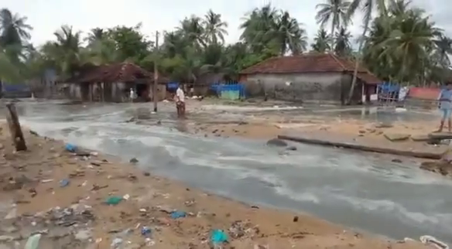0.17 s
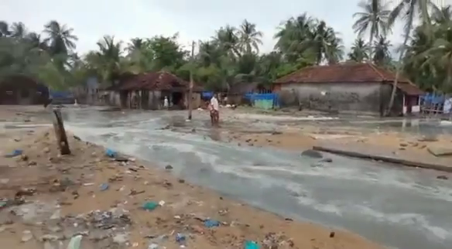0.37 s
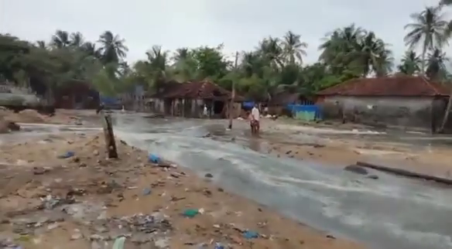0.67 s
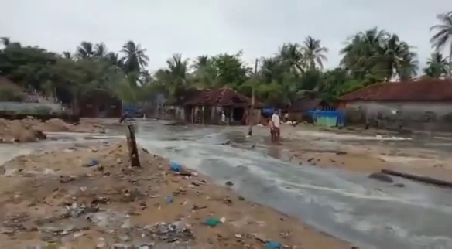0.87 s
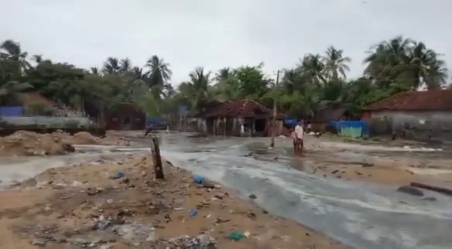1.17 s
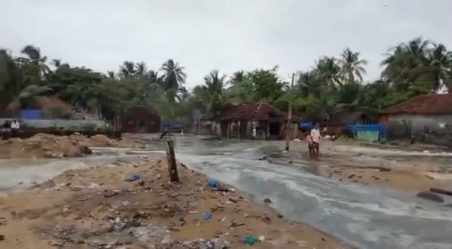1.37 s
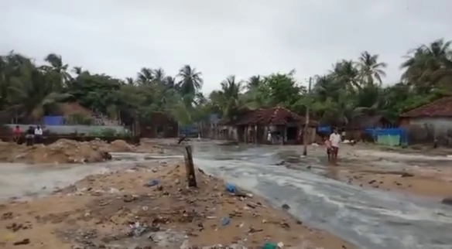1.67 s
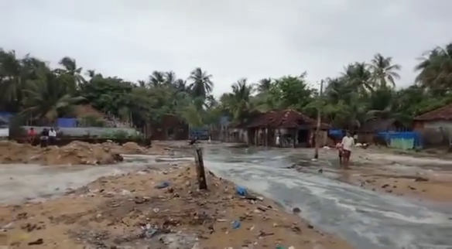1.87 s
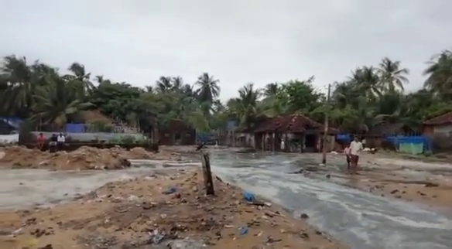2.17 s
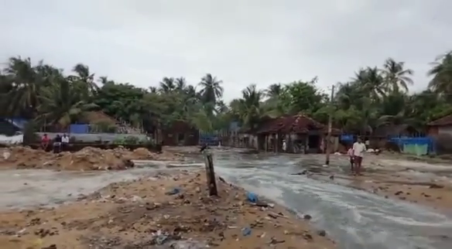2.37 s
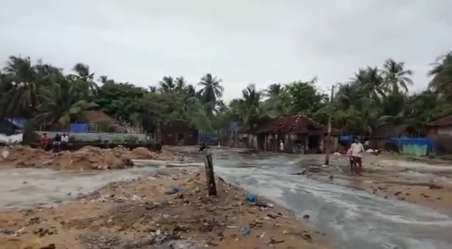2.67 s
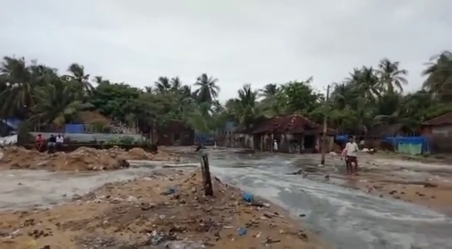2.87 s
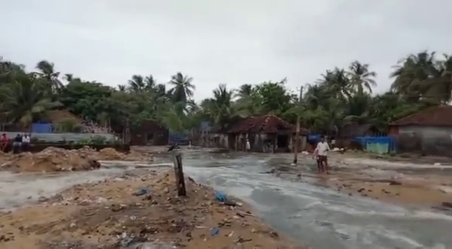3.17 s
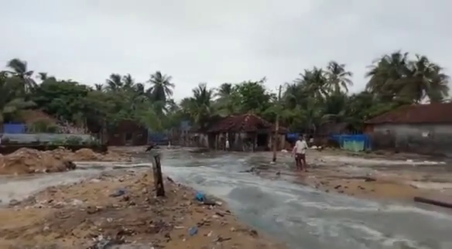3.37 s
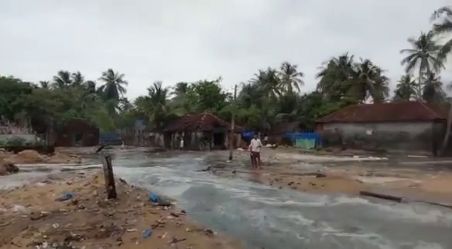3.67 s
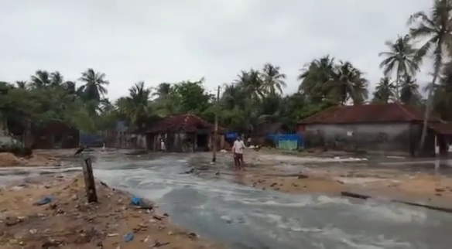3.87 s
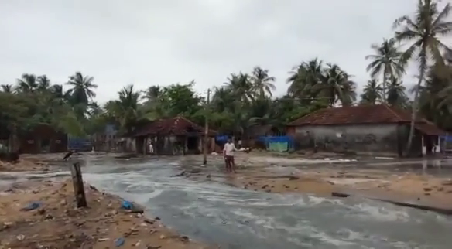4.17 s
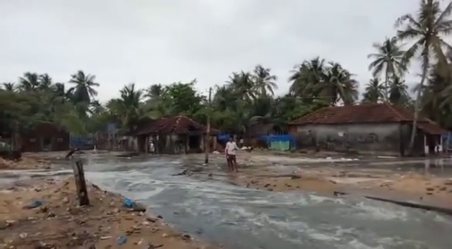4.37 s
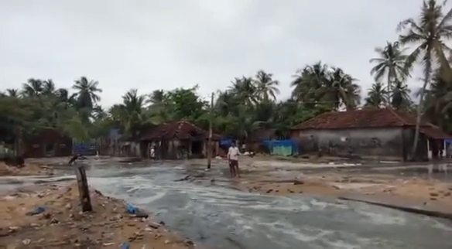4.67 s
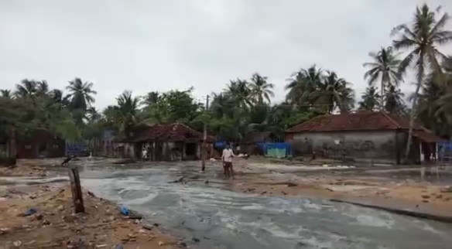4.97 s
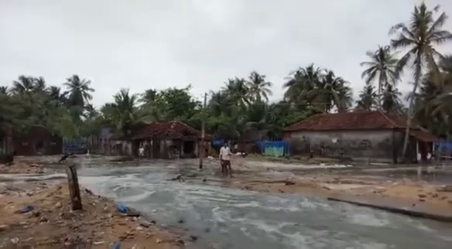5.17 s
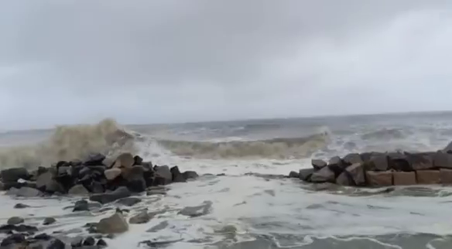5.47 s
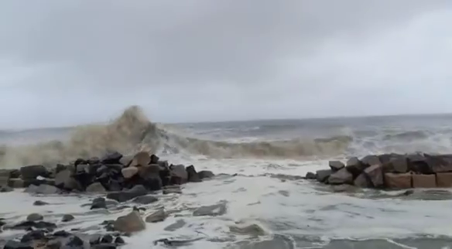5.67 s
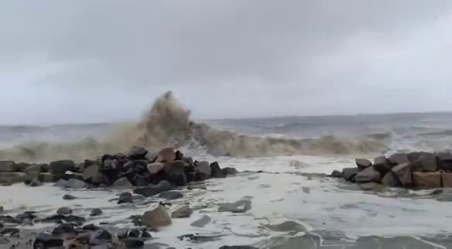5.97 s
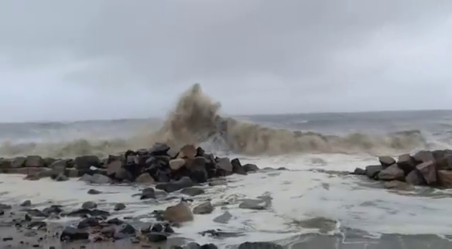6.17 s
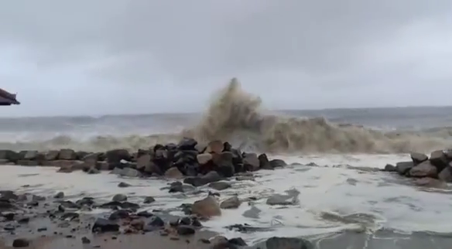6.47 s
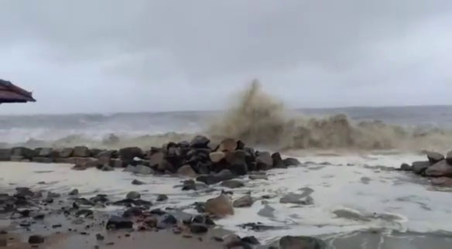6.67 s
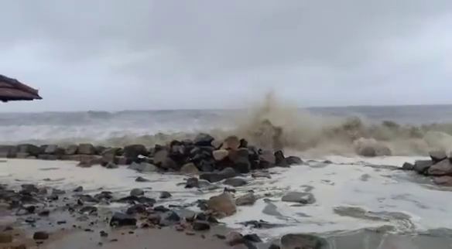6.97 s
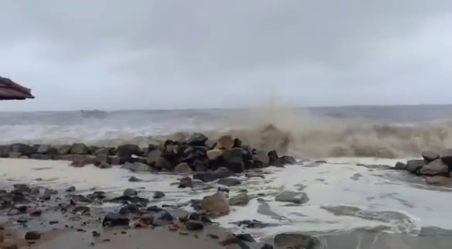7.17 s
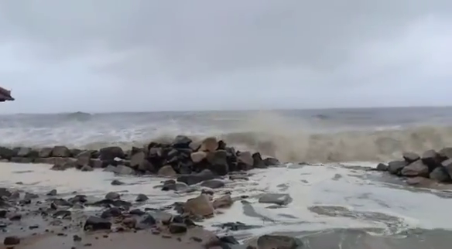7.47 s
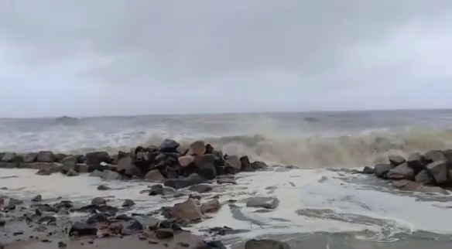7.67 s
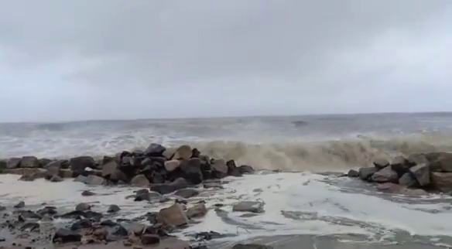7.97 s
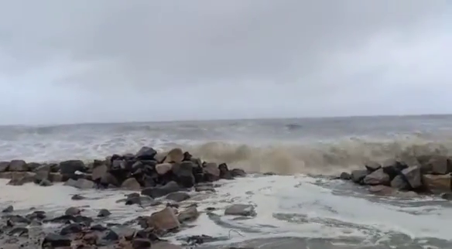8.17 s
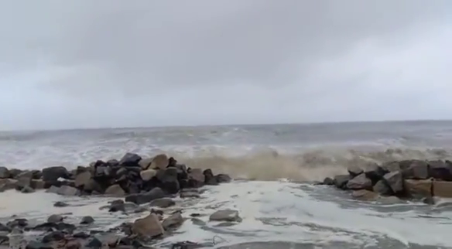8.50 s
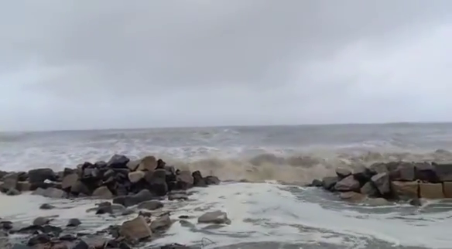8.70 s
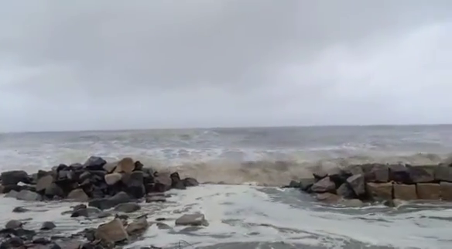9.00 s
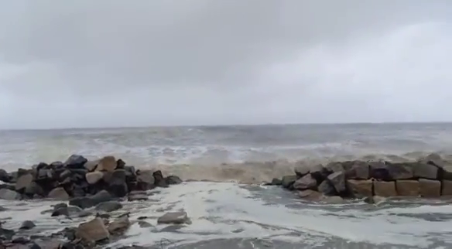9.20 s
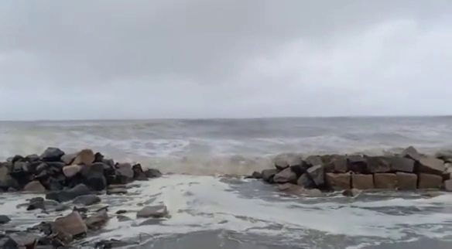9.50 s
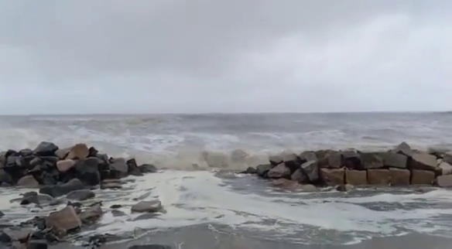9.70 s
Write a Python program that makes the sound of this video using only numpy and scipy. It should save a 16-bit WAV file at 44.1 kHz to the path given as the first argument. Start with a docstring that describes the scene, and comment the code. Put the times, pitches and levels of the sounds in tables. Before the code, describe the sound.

On an overcast windy shore, a close mono phone microphone hears water running over flooded sand. A low boom builds, then bright wash and spray swell and recede, with plops and a small splash. A crow caws hoarsely four times, echoing off houses, and a small bird whistles faintly. After a cut and brief silence, more distant breakers fade in on stereo, roaring against a rock wall.

```python
"""Heavy surf on a windy coast, in two stretches with a short silence between them.
First, on one microphone, a wave runs up over flooded sand, booming, then hissing, while a crow caws.
Then, faded in on two microphone ports, breakers roar on a rock wall further off.
Surf and wind are noise shaped over time and pitch; plops, splash and gurgles are ringing bubbles;
the crow is a set of rattling harmonics with breath, and a small far bird whistles in gliding sines."""
import sys
import numpy as np
from scipy import signal
from scipy.io import wavfile
from scipy.ndimage import uniform_filter1d, map_coordinates

SR = 44100
rng = np.random.default_rng(int(sys.argv[2]) if len(sys.argv) > 2 else 0)


def transcribe(signal):
    """Save signal, clipped to [-1, 1], as a 16-bit WAV file at the path in sys.argv[1]."""
    frames = np.atleast_2d(signal).T
    limited = np.clip(frames, -1, 1)
    pcm = np.round(limited * 32767).astype(np.int16)
    wavfile.write(sys.argv[1], SR, pcm)


N = 433944
CUT_S, BACK_S, FADE_S = 5.219, 5.346, .27  # near stretch ends, far one begins, its fade-in length
WINDOW, HOP = 2048, 256  # samples


def wave():
    """The wave on the sand: countless bubbles heard close by on one microphone."""
    # colours of roar, wash, spray and mist, one list each: f/Hz, density/dB per Hz
    layer_colours = [
        [(210, -31), (350, -4), (482, -1), (684, -3.5), (956, -1.5), (1200, -6.5), (1560, -7), (2640, -120)],
        [(710, -36), (1200, -5), (2290, -1), (2640, -4), (3720, -6), (4700, -13), (6110, -47.5), (10300, -120)],
        [(3000, -62), (5100, 1), (6760, -5.5), (8250, 0), (10700, -9.5), (13900, -42), (22000, -120)],
        [(6530, -19), (11100, 1), (12900, -5.5), (15100, -3.5), (16000, -5.5)],
    ]
    hz, gain = water(near_levels, layer_colours, swell_db=1.0, flicker_db=0.83)
    return sound(gain * noise())


def near_levels(t):
    """Boom centre in Hz, then dB of boom, wind, roar, wash, spray and mist as the wave runs up."""
    # the run-up: t/s, boom centre f/Hz, then boom, roar, wash and spray level/dB
    run_up = [(0.0, 171, -37, -37, -42, -51), (.65, 175, -34.5, -40, -40.5, -50),
              (.82, 145, -33, -39, -41.5, -50), (1.15, 143, -30.5, -38.5, -41, -50.5),
              (1.56, 140, -27.5, -38.5, -42.5, -51), (1.85, 171, -26.5, -37, -35.5, -38.5),
              (2.02, 179, -25.5, -33, -36.5, -39.5), (2.14, 202, -27.5, -38.5, -35.5, -38),
              (2.19, 214, -25, -33, -30.5, -36), (2.36, 224, -24.5, -33, -30, -36.5),
              (2.5, 217, -26, -33, -28.5, -34.5), (2.66, 227, -26, -29.5, -27, -32),
              (2.72, 236, -26, -26, -25, -33), (2.95, 244, -22.5, -29.5, -25, -31.5),
              (3.12, 248, -24, -23.5, -25, -31.5), (3.32, 250, -24.5, -27, -27.5, -34),
              (3.55, 256, -27, -28, -28, -35.5), (4.0, 253, -30, -29.5, -30, -38),
              (4.2, 250, -32.5, -33.5, -32.5, -40), (4.55, 264, -34.5, -38, -36, -47),
              (5.0, 177, -35.5, -38.5, -34, -47.5), (5.2, 174, -37, -39, -34.5, -47.5)]
    # surges and lulls of the boom: peak t/s, level above or below the swell/dB
    surges = [(.76, -0.5), (.87, 1.5), (1.09, 4), (1.29, 2.5), (1.68, 1), (1.76, 0.5), (1.82, -4.5),
              (2.83, 3.5), (3.09, 1.5), (3.24, 4), (3.5, -1.5), (3.58, -5.5)]
    # wind on the microphone: t/s, level/dB
    gusts = [(0., -52), (.65, -65), (1.1, -58), (1.7, -64), (2., -62), (2.6, -50.5), (3.1, -66),
             (3.45, -72), (4.1, -52), (5.2, -62.5)]
    mist_calm_db, spray_calm_db = -61, -47.5
    mist_per_spray = 1.26  # dB of mist per dB of spray above its calm level
    mist_peak_s, mist_settles_db_s = 3.2, 4  # mist thins sooner than the spray after its peak

    s, *columns = np.transpose(run_up)
    boom_hz, boom, roar, wash, spray = (np.interp(t, s, c) for c in columns)
    boom = boom + bumps(t, surges, rise_s=.02, fall_s=.05)
    wind = np.interp(t, *np.transpose(gusts))
    settling = mist_settles_db_s * np.maximum(t - mist_peak_s, 0)
    mist = mist_calm_db + np.maximum(mist_per_spray * (spray - spray_calm_db) - settling, 0)
    return boom_hz, boom, wind, roar, wash, spray, mist


def breakers():
    """Breakers on the wall: the ports share the bass; the treble reaches each by its own paths."""
    # colours of roar, wash, spray and mist, one list each: f/Hz, density/dB per Hz
    layer_colours = [
        [(130, -120), (260, 0), (360, -6), (450, 0), (640, 1), (850, -2.5), (1100, -5.5), (1500, -32),
         (3000, -120)],
        [(475, -120), (950, -22), (1300, -0.5), (1620, -2.5), (1920, 1), (2150, -1), (2450, 2), (2800, -1),
         (3300, -8.5), (4000, -8.5), (4600, -13), (5800, -24), (11600, -120)],
        [(2100, -120), (4200, -8), (5100, -0.5), (5600, -1), (6300, -7), (7200, -12.5), (8500, -16),
         (9600, -21.5), (10500, -21), (12500, -46), (25000, -120)],
        [(4750, -120), (9500, -27), (11200, -1), (12200, -5), (13600, 0), (15000, -4), (16000, -12)],
    ]
    # likeness of the two ports: f/Hz, shared part of the power/0-1
    likeness = [(80, .98), (240, .95), (330, .86), (450, .76), (750, .72), (950, .48), (1250, .22),
                (1400, .3), (1750, .17), (2400, .42), (3500, .25), (7000, .15), (15000, .08)]
    # balance: f/Hz, left minus right level/dB
    balance = [(60, .6), (1000, .5), (1500, 1.6), (2100, 2.8), (3400, 2.3), (4300, .8), (5500, -6.5),
               (6500, -5), (7800, 0), (15000, 0)]
    # left port late, as rumble comes from ahead and hiss from the right: f/Hz, lag/s
    lag = [(50, .0001), (700, .00004), (1400, .00012), (1800, .00047), (16000, .00048)]

    hz, gain = water(far_levels, layer_colours, swell_db=.5, flicker_db=1.3)
    like = np.clip(colour(likeness, hz), 0, 1)[:, None]
    half = undb(colour(balance, hz) / 2)[:, None]
    late = np.exp(-2j * np.pi * hz * colour(lag, hz))[:, None]
    shared = np.sqrt(like) * noise()
    left = (shared * late + np.sqrt(1 - like) * noise()) * half
    right = (shared + np.sqrt(1 - like) * noise()) / half
    return sound(gain * np.array([left, right]))


def far_levels(t):
    """The same controls for the breakers: all hissing layers swell together when one crashes."""
    # breakers on the wall: t/s, boom level/dB, hiss level above or below calm/dB
    crashes = [(5.7, -35.5, -3), (6.1, -33.5, -0.5), (6.7, -33.5, 6), (7.2, -32, 2.5), (7.7, -31.5, -1),
               (8.7, -32, -4), (9.1, -31.5, -4), (9.6, -31, -2.5)]
    # short swells and dips of the hiss: peak t/s, level above or below the slower hiss/dB
    hiss_bumps = [(5.46, 2.5), (6.37, -1), (6.7, 3), (6.83, 3), (7.13, 0), (7.75, 1.5), (7.86, 3),
                  (8.42, 1.5), (8.59, 2.5), (9.03, 0.5), (9.2, 1)]
    # calm level/dB of roar, wash, spray, mist
    calm_db = [-41, -47, -51, -62]
    # how far each of these follows the hiss: dB per dB
    follow = [0.51, 0.45, 0.55, 0.39]
    boom_hz, wind_db = 124, -26  # wind level is against the boom

    s, boom, hiss = np.transpose(crashes)
    boom = np.interp(t, s, boom)
    hiss = np.interp(t, s, hiss) + bumps(t, hiss_bumps, rise_s=.03, fall_s=.07)
    layers = [db + k * hiss for db, k in zip(calm_db, follow)]
    return boom_hz + 0 * t, boom, boom + wind_db, *layers


def bumps(t, rows, rise_s, fall_s):
    """Short swells or dips in dB, quicker to come than to go."""
    return sum(db * np.exp(-((t - s) / np.where(t < s, rise_s, fall_s)) ** 2) for s, db in rows)


def water(controls, colours, swell_db, flicker_db):
    """Gain over pitch and time of countless bursting bubbles: big ones boom, small ones hiss."""
    # boom colour: f as a multiple of the centre, density/dB
    boom_colour = [(.2, -54), (.4, -12.5), (.6, -3.5), (.9, -0.5), (1.5, -5.5), (2.3, -12.5), (3.5, -21.5),
                   (8, -120)]
    # wind buffeting the microphone: f/Hz, density/dB per Hz
    wind_colour = [(15, -23.5), (30, -16.5), (50, -9.5), (65, 4), (85, 0.5), (200, -120)]
    # band in which each level is meant, for boom, wind, roar, wash, spray, mist: low f/Hz, high f/Hz
    level_bands = [(75, 380), (25, 80), (400, 1150), (2700, 4500), (5000, 10500), (11000, 15800)]

    hz = np.arange(WINDOW // 2 + 1) * SR / WINDOW
    t = np.arange(N // HOP + 2) * HOP / SR
    boom_hz, *levels = controls(t)
    # the cloud of big bubbles rings broadly around its centre, which may move with the wave
    boom = undb(2 * colour(boom_colour, hz[:, None] / boom_hz))
    shapes = [boom] + [undb(2 * colour(c, hz))[:, None] for c in [wind_colour] + colours]
    power = 0
    for shape, (lo, hi), db in zip(shapes, level_bands, levels):
        in_band = shape[(hz >= lo) & (hz <= hi)].sum(axis=0)
        power = power + len(hz) * shape / in_band * undb(2 * db)
    swell = swell_db * patches(hz, len(t), per_s=2.86, per_octave=1.564)
    flicker = flicker_db * patches(hz, len(t), per_s=14., per_octave=2.995)
    return hz, np.sqrt(power) * undb(swell + flicker)


def patches(hz, frames, per_s, per_octave):
    """Smooth chance over time and pitch, spread about 1."""
    grid = rng.standard_normal((64, 512))
    row = np.log2(np.maximum(hz, 20) / 20) * per_octave
    col = np.arange(frames) * HOP / SR * per_s
    where = np.meshgrid(row, col, indexing="ij")
    return 0.71 * map_coordinates(grid, where, order=3, mode="wrap")


def noise():
    """Short-time spectrum of white noise."""
    white = rng.standard_normal(N + HOP)
    return signal.stft(white, nperseg=WINDOW, noverlap=WINDOW - HOP)[2][:, :N // HOP + 2]


def sound(spectrum):
    """Turn a short-time spectrum back into a waveform."""
    return signal.istft(spectrum, nperseg=WINDOW, noverlap=WINDOW - HOP)[1][..., :N]


def plops():
    """Single drops and pockets of air close by, each a ringing bubble."""
    # t/s, f/Hz, level/dB, t60/s, upward glide (half the share by which f has risen at t60)
    drops = [(.079, 5250, -39, .025, .02), (.079, 5900, -39, .025, .02), (.435, 2250, -27, .08, .02),
             (1.418, 1550, -24, .03, .05), (1.42, 1950, -30, .02, .05), (1.978, 1750, -22, .03, .02),
             (1.834, 520, -18, .08, .03), (5.04, 3000, -26, .08, .02), (9.335, 2050, -36, .08, .06),
             (9.738, 2080, -25, .022, .02), (9.738, 3800, -27, .004, .02), (9.744, 2070, -36, .14, .2)]
    out = np.zeros(N)
    for s, hz, db, t60, glide in drops:
        add(out, s, undb(db) * bubble(hz, t60, glide))
    return out


def splash():
    """A handful of spray lands near: a quick cluster of small bubbles, tending to smaller ones last."""
    start_s, length_s, level_db = 1.835, .045, -26.5
    lowest_hz, span = 2850, 1.5  # span: ratio of highest to lowest pitch
    out = np.zeros(N)
    for when, pitch in rng.random((30, 2)):
        hz = lowest_hz * span ** (np.sqrt(when) * (.2 + .8 * pitch))
        add(out, start_s + when * length_s, undb(level_db) * bubble(hz, t60=.03, glide=.05))
    return out


def gurgle(db, cycles):
    """Scattered small bubbles in the running water, each dying by 60 dB over the same time in cycles/hz."""
    out = np.zeros(N)
    for when, pitch, size in rng.random((1500, 3)):
        hz = 700 * 2 ** (2.6 * pitch)
        add(out, when * N / SR, undb(db - 10 * size) * bubble(hz, cycles / hz, glide=0.22))
    return out


def bubble(hz, t60, glide):
    """A dying ring whose pitch climbs as the bubble nears the surface."""
    t = np.arange(int(t60 * SR)) / SR
    ring = np.sin(2 * np.pi * hz * (t + glide * t ** 2 / t60))
    attack = np.minimum(t / 0.00041, 1)
    return ring * undb(-60 * t / t60) * attack


def birds():
    """The crow with an echo off the houses, and the thin broken whistle of a small far bird."""
    # caws: t/s, length/s, f at start/Hz, f at top/Hz, f at end/Hz, top as a share of the length,
    # level/dB, swell up to the top/dB, rattle f/Hz, beak at start and at end/dB per octave,
    # unevenness/0-1, hoarseness/0-1
    caws = [(1.67, .26, 480, 498, 430, .52, -27.5, 3, 73, -18, -4, .55, .28),
            (2.35, .2, 478, 484, 470, .35, -27, 5, 73, -22, -18, .2, .4),
            (3.63, .285, 430, 478, 435, .42, -22.5, 6, 78, -12, 10, .45, .45),
            (4.705, .29, 435, 497, 400, .52, -23, 11, 77, -6, 20, .12, .18)]
    # whistled notes: t/s, length/s, start f/Hz, end f/Hz, peak level/dB
    whistles = [(.04, .075, 3790, 3800, -45), (.12, .105, 3830, 3790, -46), (.23, .06, 3660, 3620, -44),
                (4.16, .15, 3700, 3700, -36)]

    out = np.zeros(N)
    for s, *row in caws:
        call = caw(*row)
        add(out, s, call)
        add(out, s + .045, undb(-11) * call)  # echo
    for s, length, hz, end_hz, db in whistles:
        t = np.arange(int(length * SR)) / SR
        cycles = hz * t + (end_hz - hz) * t ** 2 / (2 * length)
        arch = np.sqrt(np.sin(np.pi * t / length))
        add(out, s, undb(db) * arch * np.sin(2 * np.pi * cycles))
    return out


def caw(length, start_hz, top_hz, end_hz, top, db, rise_db, rattle_hz, beak_from_db, beak_to_db,
        uneven, hoarse):
    """Harmonics through the throat, chopped by a slow rattle of the second membrane, with breath."""
    # throat resonance: f/Hz, level/dB
    throat = [(480, -24), (960, -15), (1430, -4), (1650, 0), (1950, 0), (2150, -10), (2450, -8),
              (2800, -32), (4000, -44)]
    attack_s, release_s, fall_db = .035, .025, 4.5  # fall: effort lost at the end

    t = np.arange(int(length * SR)) / SR
    # effort arches over the call: pitch and level follow it, the beak moves steadily
    off = np.interp(t / length, [0, top, 1], [-1, 0, 1])
    hz = top_hz + off ** 2 * (np.where(off < 0, start_hz, end_hz) - top_hz)
    effort_db = db - np.where(off < 0, rise_db, fall_db) * off ** 2
    edges = np.clip(np.minimum(t / attack_s, (length - t) / release_s), 0, 1)
    gain = undb(effort_db) * edges
    beak_db = beak_from_db + (beak_to_db - beak_from_db) * t / length

    # a hoarse call wavers in pitch, rattle and strength
    wavers = uniform_filter1d(rng.standard_normal((3, SR)), 400)[:, :len(t)]
    drift, stumble, shake = wavers * 20 * hoarse
    rattle = np.cos(2 * np.pi * np.cumsum(rattle_hz * (1 + .12 * stumble)) / SR)
    phase = 2 * np.pi * np.cumsum(hz * (1 - .044 * rattle + .022 * drift)) / SR

    # a wider beak lifts the upper partials
    partials = []
    for k in range(1, 9):
        beak_octaves = np.clip(np.log2(k / 3), 0, .45)
        partials.append(undb(colour(throat, k * hz) + beak_db * beak_octaves))
    # the throat shifts partials out of step, so each cycle rings rather than clicks
    voice = sum(g * np.sin((k + 1) * phase + np.pi * k ** 2 / 2) for k, g in enumerate(partials))
    voice = voice / np.sqrt(sum(g ** 2 for g in partials) / 2)
    # strong and weak cycles in turn put lines half way between the partials
    voice = voice * (1 + np.clip(uneven, 0, 1) * np.cos(phase / 2))

    breath_band = signal.butter(2, [1350, 2050], "band", fs=SR, output="sos")
    breath = signal.sosfilt(breath_band, rng.standard_normal(SR))[:len(t)]
    call = voice / voice.std() + .8 * hoarse * breath / breath.std()
    call = call * (1 + .55 * rattle) * undb(3 * shake)
    return gain * call / call.std()


def add(out, s, x):
    """Lay a sound into the track from s seconds on."""
    i = int(s * SR)
    out[i:i + len(x)] += x[:len(out) - i]


def colour(points, hz):
    """Read a (f, value) table on a log-frequency axis."""
    f, v = np.transpose(points)
    return np.interp(np.log(np.maximum(hz, 1e-3)), np.log(f), v)


def undb(db):
    """Amplitude ratio of a level in dB."""
    return 10 ** (np.asarray(db) / 20)


def scene():
    """The wave, then a short silence, then the breakers; the plops run through both stretches."""
    t = np.arange(N) / SR
    first = np.clip((CUT_S - t) / .004, 0, 1)
    # the fade opens with a small step
    second = np.clip((t - BACK_S) / FADE_S + .02, 0, 1) * (t > BACK_S + .006)
    drops = plops()
    near = wave() + birds() + drops + splash() + gurgle(db=-42., cycles=40.)
    far = breakers() + drops + gurgle(db=-50., cycles=40.)
    return first * near + second * far


def record(dry):
    """The phone cuts the top: a steep low-pass at 15900 Hz."""
    top_cut = signal.ellip(10, .2, 70, 15900, fs=SR, output="sos")
    return signal.sosfilt(top_cut, dry)


dry = scene()
out = record(dry)
transcribe(out)
```